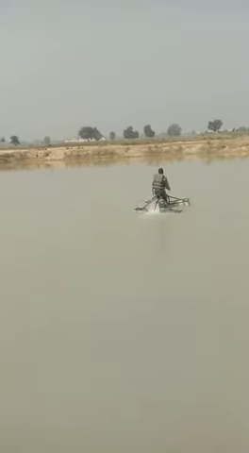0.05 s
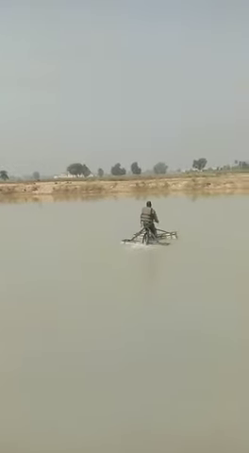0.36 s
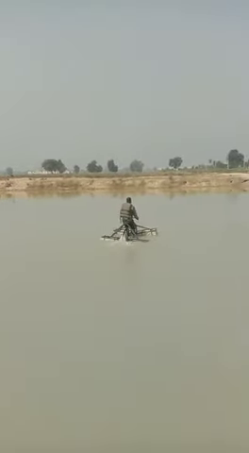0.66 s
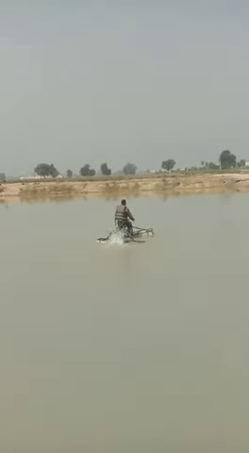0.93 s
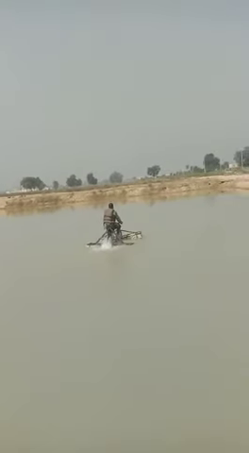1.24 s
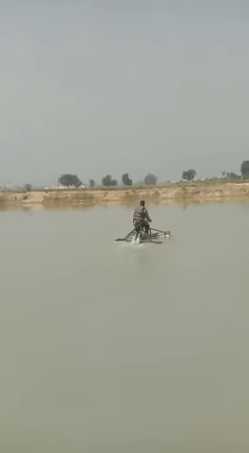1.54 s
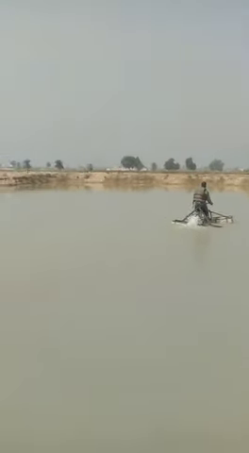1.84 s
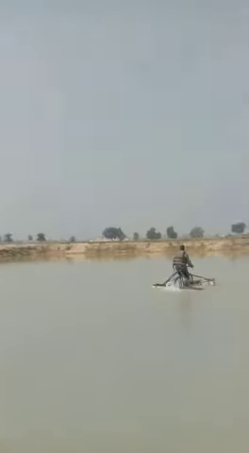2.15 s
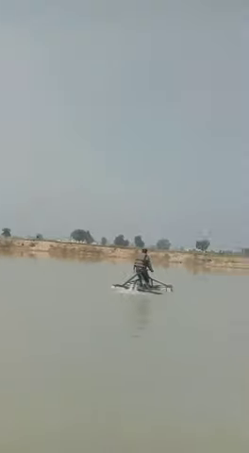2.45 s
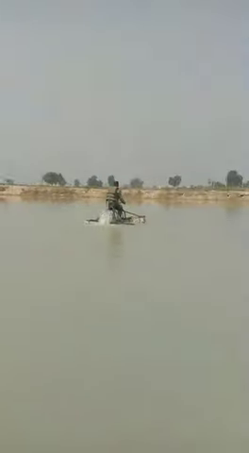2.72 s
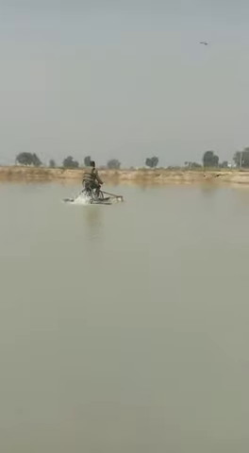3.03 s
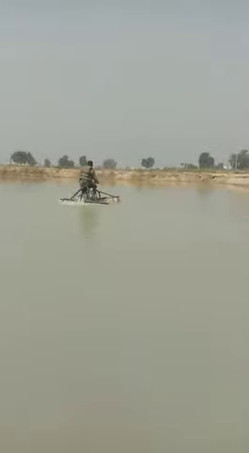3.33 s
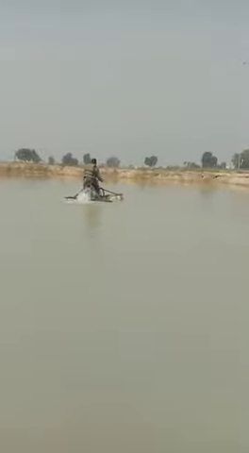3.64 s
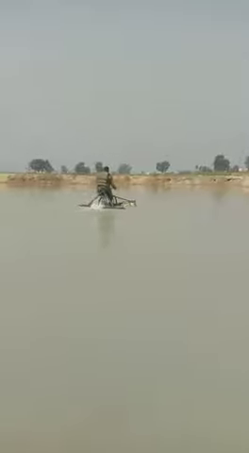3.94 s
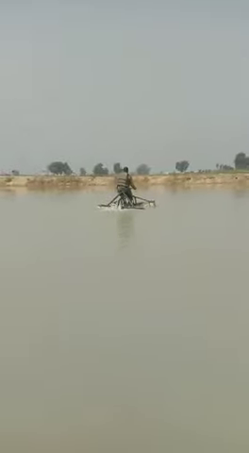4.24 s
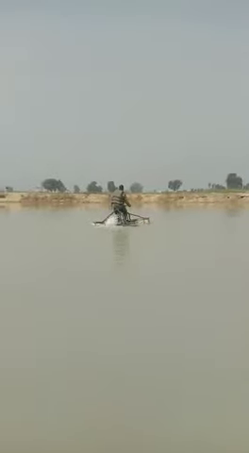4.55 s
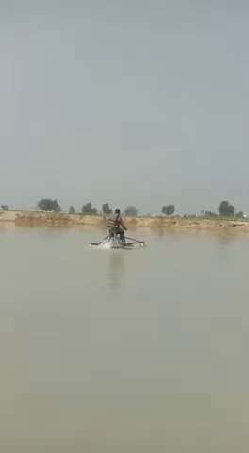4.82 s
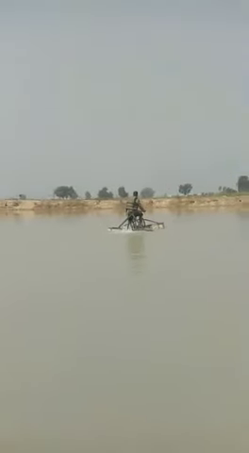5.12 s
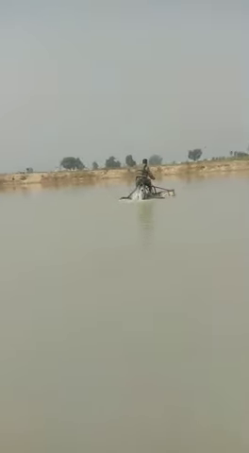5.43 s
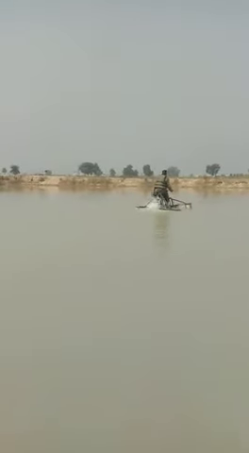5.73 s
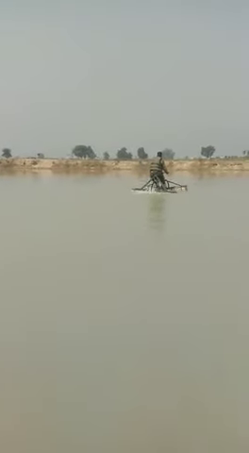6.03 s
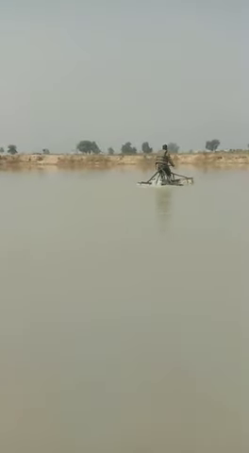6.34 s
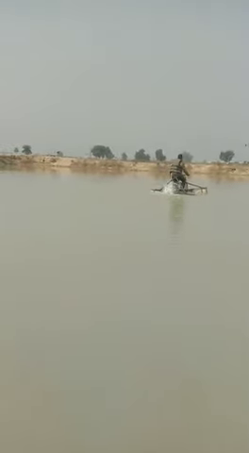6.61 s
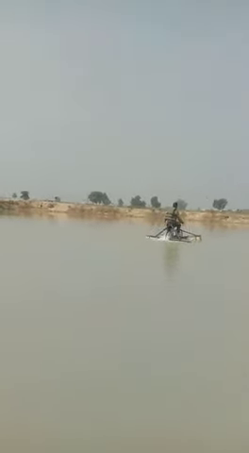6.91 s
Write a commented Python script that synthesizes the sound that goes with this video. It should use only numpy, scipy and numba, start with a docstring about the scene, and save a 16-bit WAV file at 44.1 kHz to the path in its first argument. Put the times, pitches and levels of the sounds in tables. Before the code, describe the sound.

A pedal boat's paddle wheel splashes and churns water some way off, with bubbling gurgles and a low wind rumble on the microphone.

```python
"""From the start a pedal boat crosses a wide pond some way off: its blades slap the water, churn
bubbles under and throw up spray that patters back. At 0.36 s a gust buffets the phone's single
microphone, whose port colours everything; lighter wind goes on. The wash sags as the pedals pass
dead points. At 4.9 s a drop snaps close by. At 7.03 s, the very end, a bird gives one falling call."""
import sys
import numpy as np
from scipy import signal
from scipy.fft import rfft, irfft, next_fast_len
from scipy.io import wavfile
from scipy.ndimage import uniform_filter1d
from numba import njit

SR = 44100
rng = np.random.default_rng(int(sys.argv[2]) if len(sys.argv) > 2 else 0)


def to_wav(sig):
    """Store sig (one row per channel, or 1-D mono) as 16-bit WAV at the path in sys.argv[1].

    Samples outside -1..1 are clipped; the rate is SR.
    """
    pcm = np.clip(np.atleast_2d(sig), -1, 1) * 32767
    pcm = np.round(pcm).astype(np.int16)
    wavfile.write(sys.argv[1], SR, pcm.T)  # frames by channels


N = 311787
TIME_S = np.arange(N) / SR

# Blade slaps, splashes and soft bubble gurgles.
# Each row: start in seconds, slap, gulp and spray in relative dB, burst in seconds.
SPLASHES = [(0.118, -21.5, -38.5, -42.5, 0.018), (0.639, -30.5, -40, -44.5, 0.072),
            (0.779, -28, -39, -33, 0.01), (0.943, -24, -36.5, -37, 0.0095), (1.087, -30, -41.5, -36, 0.025),
            (1.38, -23.5, -41.5, -38.5, 0.0086), (1.577, -20.5, -34, -37.5, 0.0027),
            (1.765, -16, -35.5, -33, 0.013), (1.903, -27, -36, -41, 0.0078),
            (1.955, -39, -39.5, -51, 0.021), (2.158, -22, -43.5, -53, 0.0057),
            (2.373, -29, -44.5, -41, 0.01), (2.431, -29, -42.5, -61, 0.02),
            (2.597, -14, -36.5, -31.5, 0.003), (2.715, -24, -36.5, -35, 0.016),
            (2.88, -25, -39.5, -41, 0.021), (3.305, -20.5, -40.5, -39.5, 0.018),
            (3.456, -23, -43, -40.5, 0.029), (3.641, -24, -38.5, -39, 0.01),
            (3.779, -28, -38, -38.5, 0.0077), (4.016, -26, -43.5, -51, 0.023),
            (4.039, -18.5, -46, -40.5, 0.0076), (4.229, -25, -40, -44.5, 0.023),
            (4.46, -19, -42.5, -45, 0.03), (4.58, -26, -37.5, -36.5, 0.012),
            (4.758, -20, -37.5, -39, 0.021), (4.937, -22, -46.5, -38.5, 0.045),
            (5.251, -17, -38.5, -39, 0.0038), (5.391, -21, -37, -48, 0.022),
            (5.567, -16.5, -37, -36.5, 0.011), (5.705, -19.5, -38.5, -41, 0.0092),
            (5.999, -25, -58, -49, 0.048), (6.202, -21, -43, -43.5, 0.017), (6.414, -19.5, -54, -45, 0.019),
            (6.429, -19.5, -37, -53, 0.0091), (6.559, -23, -39.5, -40, 0.011),
            (6.765, -23.5, -45, -49, 0.03)]
# Water landing flat. Each row: start in seconds, level in dB, share of fine spray from 0 to 1.
FLAT_HITS = [(0.124, -26, 0), (0.701, -36, 0.4), (0.946, -27, 0.34), (1.16, -34, 0.6), (1.343, -31, 0),
             (1.579, -28.5, 0.73), (1.725, -26.5, 0.3), (1.764, -27.5, 1), (2.25, -33, 0),
             (2.591, -22.5, 0.2), (3.165, -27.5, 0.1), (3.292, -28, 0), (3.308, -25, 0.1),
             (3.775, -31, 0.04), (4.043, -33, 0), (4.15, -34.5, 0.6), (4.459, -33.5, 0.33),
             (5.245, -38, 0.3), (5.475, -29.5, 0.47), (5.568, -30.5, 0), (5.579, -30, 0.05),
             (6.429, -26, 0.07), (6.556, -30.5, 0.17), (6.987, -29.5, 0.12)]
# Trapped air. Each row: start in seconds, centre pitch in Hz, peak of each ring in dB.
AIR_POCKETS = [(0.12, 1030, -24), (0.944, 680, -37), (1.767, 860, -45), (2.16, 1190, -36),
               (2.594, 790, -30.5), (3.308, 990, -29.5), (4.04, 1230, -26.5), (4.461, 900, -43),
               (4.762, 635, -43), (5.568, 1210, -24.5)]
# Drift of the wash. Each row: time in seconds, drops, mist and sizzle in relative dB.
WASH_LEVELS = [(0, -42.5, -47, -64), (0.27, -40, -39.5, -62.5), (0.55, -45.5, -49.5, -62.5),
               (0.8, -43.5, -45, -63), (1.12, -40, -41.5, -61), (1.45, -44, -52, -59),
               (2.2, -40, -51.5, -63), (2.75, -44, -49, -63), (3.08, -37, -45, -56),
               (3.55, -42.5, -45.5, -78), (4.25, -43, -48.5, -69), (4.95, -41, -45, -60),
               (5.35, -43, -49.5, -68.5), (5.8, -40.5, -51, -58), (6.3, -45, -50, -70),
               (6.95, -40, -51.5, -59.5)]
# Pedal dead points. Each row: time in seconds, relative depth of the sag in dB.
DEAD_POINTS = [(0.57, 1), (1.53, 1.5), (2.55, 4.5), (4.41, 2.5), (5.34, 6.5), (6.36, 1.8)]
# Thrown sheets. Each row: peak time in seconds, slosh in dB, fizz in dB, half length in seconds.
SHEETS = [(0.286, -48, -61, 0.097), (1.17, -49, -54.5, 0.28), (1.672, -52, -59, 0.072),
          (1.91, -50.5, -60.5, 0.21), (2.243, -46, -53.5, 0.22), (2.504, -57, -59, 0.086),
          (4.523, -51, -54, 0.026), (5.032, -50.5, -71, 0.23), (6.087, -53.5, -68, 0.055),
          (6.922, -45.5, -68, 0.09)]
# Large bubbles. Each row: start in seconds, pitch in Hz, level in dB.
BIG_BUBBLES = [(1.385, 1180, -36.5), (1.765, 701, -27.5), (1.81, 777, -30), (1.828, 1270, -32.5),
               (1.938, 765, -39), (1.971, 2350, -25.5), (2.008, 1350, -31), (2.029, 603, -34),
               (2.133, 1305, -35), (2.159, 1173, -28.5), (2.434, 553, -44), (2.66, 1680, -28),
               (3.817, 423, -42.5), (4.041, 1280, -29.5), (4.457, 1336, -29.5), (6.562, 710, -34)]
# Echo off a nearby hard surface. Each row: time in seconds, delay in ms, gain in dB.
ECHO_PATH = [(0, 2.45, -22), (0.75, 2.32, -19), (1.7, 2.48, -24), (2.7, 2.36, -15), (3.3, 2.25, -11),
             (4.2, 2.27, -7), (4.8, 2.28, -22), (5.4, 2.3, -17), (6.25, 2.19, -11), (7.0, 2.1, -20)]
# Light wind. Each row: time in seconds, level in dB.
BREEZE_LEVELS = [(0, -46), (0.19, -48.5), (0.3, -36.5), (1.05, -45.5), (1.42, -58), (1.75, -49.5),
                 (2.6, -53), (2.95, -46), (4.1, -48), (5.7, -44.5), (6.3, -44), (6.6, -44), (7.07, -42)]
# Gusts. Each row: peak time in seconds, level in dB, half length in seconds.
GUST_PEAKS = [(0.358, -27, 0.057), (0.547, -45.5, 0.082), (0.79, -48, 0.041), (1.085, -45.5, 0.032),
              (1.943, -44, 0.023), (2.26, -47.5, 0.044), (2.445, -45, 0.014)]
# Single eddies at the port. Each row: peak time in seconds, pitch in Hz, level in dB.
EDDIES = [(0.222, 85, -28), (0.234, 196, -30.5), (0.279, 158, -26), (0.305, 199, -15.5), (0.325, 115, -18),
          (0.333, 179, -28.5), (0.381, 153, -23.5), (0.393, 86.5, -17), (0.428, 129, -19.5),
          (0.476, 104, -24), (0.504, 104, -23.5), (0.563, 125, -26.5), (0.578, 121, -25.5),
          (0.655, 83, -34), (0.683, 108, -30), (0.757, 79.6, -23.5), (0.791, 107, -25.5), (0.821, 93, -25),
          (1.927, 76, -31), (6.16, 100, -31.5), (6.254, 106, -31), (6.385, 105, -29.5)]
# Bird call. Each row: time in seconds, pitch in Hz, level in dB.
BIRD_CALL = [(7.033, 1385, -50), (7.034, 1385, -32), (7.048, 1360, -32), (7.058, 1315, -34),
             (7.07, 1175, -38)]
# Its harmonics. Each row: multiple of the pitch, relative level in dB.
BIRD_HARMONICS = [(1, -24), (2, -2), (3, 0), (4, -11), (6, -30)]
# Close ticks. Each row: peak time in seconds, pitch in Hz, level in dB.
NEAR_TICKS = [(0.4115, 6150, -32), (2.417, 7100, -37)]
# Close rustles. Each row: peak time in seconds, level in dB, half length in seconds.
NEAR_RUSTLES = [(0.355, -52, 0.039), (6.113, -47.5, 0.023)]
# Resonances and notches of port and case. Each row: centre in Hz, width in Hz, gain in dB.
PORT_BANDS = [(409, 32, 8), (1253, 80, 10), (1740, 20, 1.5), (4300, 1700, -1.5), (5530, 800, 9),
              (6537, 806, -25.5), (7380, 1600, 11.5), (13540, 1500, -15), (15000, 510, 8.5)]
# Noise profile of the suppressor. Each row: frequency in Hz, density in dB per Hz.
NOISE_FLOOR = [(200, -105), (600, -86), (1200, -99.5), (2800, -86.5), (4300, -91), (5600, -99),
               (7500, -106.5), (10000, -105), (14000, -116), (15500, -117)]

# Source spectra, slap first. Each row: frequency in Hz, relative level in dB.
SLAP_SPECTRUM = [(200, -17), (600, -6.5), (1000, 3.5), (2600, 7), (4000, -6.5), (7000, -12), (16000, -34)]
GULP_SPECTRUM = [(80, -13), (200, -7), (330, -11), (600, 6), (850, 7), (1200, 9), (2500, -10)]  # air pulled under
SPRAY_SPECTRUM = [(1500, -16), (3000, 3.5), (4000, 4), (5500, -3), (8000, 1.1), (10500, -14.5),
                  (13500, -10), (16000, -17)]  # fine spray
DROP_SPECTRUM = [(250, -17.5), (700, -11), (1100, -5.5), (2000, -0.5), (2700, 1.5), (3400, -4),
                 (4000, -11.5), (5000, -14.5), (12000, -43)]  # falling drops
MIST_SPECTRUM = [(1500, -42), (3100, -2), (4200, -8.5), (5500, -4), (7800, 1.5), (9500, -13.5),
                 (13500, -19), (16000, -27)]  # falling mist
SLOSH_SPECTRUM = [(1200, -28), (2800, 0), (3800, 7.5), (4700, -2), (5600, -4), (7000, -36)]  # a sheet's coarse drops
FIZZ_SPECTRUM = [(5000, -27), (7500, 7), (9000, 5), (10700, -1.5), (11800, -27), (16000, -8)]  # a sheet's finest drops
BREEZE_SPECTRUM = [(15, -57), (35, -33), (60, -14.5), (85, -1), (115, -1), (180, -9.5), (260, -27.5),
                   (600, -74), (2000, -81)]  # light wind
GUST_SPECTRUM = [(15, -56), (35, -22), (70, 7), (130, 6), (260, -2), (370, -18), (600, -23), (2000, -43)]  # strong wind
RUSTLE_SPECTRUM = [(3500, -30), (5000, -8), (5800, -11), (6500, 1), (7300, -19), (9000, -37)]  # close rustle
SNAP_SPECTRUM = [(3000, -15), (6000, -7), (8500, 3), (11000, -25), (15500, 3)]  # close drop


def splashes():
    """Blade slaps, splashes and soft bubble gurgles: mixes of impact, trapped air and fine spray."""
    _, slap_db, gulp_db, spray_db, _ = np.transpose(SPLASHES)
    slap = colour(patter(rate_hz=8000, spread_db=3.2), SLAP_SPECTRUM)
    gulp = colour(bubbles(184, 1263, cycles=14.4, spread_db=-0.5, rise=0.25, count=6000), GULP_SPECTRUM)
    spray = colour(patter(rate_hz=8000, spread_db=1.5), SPRAY_SPECTRUM)
    slap *= splash_envelope(slap_db - 17, attack_s=0.002, stretch=1, tail_db=-7, tail_s=0.034)
    gulp *= splash_envelope(gulp_db - 4.5, attack_s=0.005, stretch=1.07, tail_db=-2.5, tail_s=0.046)
    spray *= splash_envelope(spray_db - 5, attack_s=0.00067, stretch=1, tail_db=-2.5, tail_s=0.017)
    return slap + gulp + spray


def splash_envelope(levels_db, attack_s, stretch, tail_db, tail_s, lead_db=-14, lead_s=0.01):
    """Water heaps up, bursts, then closes in again."""
    out = np.zeros(N)
    for (start_s, *_, burst_s), db in zip(SPLASHES, levels_db):
        start = int(start_s * SR)
        span = slice(max(start - SR // 10, 0), start + SR // 2)
        t = TIME_S[span] - start_s
        age_s = np.maximum(t, 0)
        lead = undb(lead_db) * np.exp(-np.abs(t) / lead_s)
        attack = 1 - np.exp(-age_s / attack_s)
        burst = np.exp(-(age_s / (stretch * burst_s)) ** 2)
        tail = undb(tail_db) * np.exp(-age_s / tail_s)
        out[span] += undb(db) * (lead + attack * (burst + tail))
    return out


def cracks(decay_s=0.0023, tail_db=-11, tail_s=0.013):
    """A blade or sheet of water lands flat, snaps and scatters; thin sheets sound brighter."""
    heavy = colour(rng.standard_normal(N), SLAP_SPECTRUM)
    thin = colour(rng.standard_normal(N), SPRAY_SPECTRUM)
    out = np.zeros(N)
    for start_s, db, fine in FLAT_HITS:
        span = slice(int(start_s * SR), int(start_s * SR) + SR // 10)
        t = TIME_S[span] - start_s
        snap = np.sqrt(1 - fine) * heavy[span] + np.sqrt(fine) * thin[span]
        envelope = np.hypot(np.exp(-t / decay_s), undb(tail_db) * np.exp(-t / tail_s))
        out[span] += undb(db) * snap * envelope
    return out


def pockets(count=4, cycles=11.6, spread_octaves=1, breakup_s=0.009):
    """A flat blade shuts in a pocket of air, which breaks into short, hollow rings."""
    out, t = np.zeros(N), TIME_S[:SR // 20]
    for start_s, centre_hz, db in AIR_POCKETS:
        for k, (late, detune) in enumerate(rng.random((count, 2))):
            hz = centre_hz * 2 ** (spread_octaves * (detune - 0.5))
            start = int((start_s + breakup_s * (k + late) / count) * SR)
            decay = np.exp(-np.log(1000) * t * hz / cycles)
            out[start:start + len(t)] += undb(db) * decay * np.sin(2 * np.pi * hz * t)
    return out


def wash(churn_db=-56):
    """Bubbles churn under the wheel while drops and mist rain back unevenly."""
    _, slap_db, gulp_db, spray_db, _ = np.transpose(SPLASHES)
    drops_db, mist_db, sizzle_db = curves(WASH_LEVELS)
    sag_db, flutter_db = wheel_sag_db(), 0.9 * walk(rate_hz=45)
    churn = colour(bubbles(260, 1300, cycles=24, spread_db=2, rise=0.15, count=2800), GULP_SPECTRUM)
    spatter = undb(-10) * bubbles(1000, 4500, cycles=9, spread_db=2.6, rise=0.1, count=3000)
    drops = colour(patter(rate_hz=9000, spread_db=1.6) + spatter, DROP_SPECTRUM)
    mist = colour(patter(rate_hz=14000, spread_db=6.5), MIST_SPECTRUM)
    sizzle = colour(patter(rate_hz=9000, spread_db=5), SPRAY_SPECTRUM)
    # After a splash, bubbles surface, thrown water falls back and fine spray hangs.
    surfacing = np.hypot(undb(churn_db), aftermath(gulp_db - 10.5, peak_s=0.034))
    falling = np.hypot(undb(drops_db - 1.9), aftermath(slap_db - 28.5, peak_s=0.067))
    hanging = np.hypot(undb(sizzle_db + 10), aftermath(spray_db - 17.5, peak_s=0.034))
    return (churn * surfacing * undb(walk(rate_hz=25) - 2.4 * sag_db)
            + drops * falling * undb(flutter_db - 0.63 * sag_db)
            + mist * undb(mist_db - 8 + flutter_db - sag_db)
            + sizzle * hanging * undb(flutter_db - 0.3 * sag_db))


def aftermath(levels_db, peak_s):
    """A swell follows each slap, splash or gurgle and dies away; overlaps add in power."""
    age = TIME_S[:SR] / peak_s
    shape = (age * np.exp(1 - age)) ** 2
    power = np.zeros(N)
    for (start_s, *_), db in zip(SPLASHES, levels_db):
        start = int(start_s * SR)
        power[start:start + SR] += undb(db) ** 2 * shape[:N - start]
    return np.sqrt(power)


def wheel_sag_db(fall_s=0.14, rise_s=0.077):
    """The wheel slows into a dead point: the wash sinks, then recovers with the next push."""
    return sum(db * swell(at_s, np.where(TIME_S < at_s, fall_s, rise_s)) for at_s, db in DEAD_POINTS)


def showers():
    """A sheet of water thrown off the wheel breaks up: coarse drops slosh, the finest fizz."""
    tinkle = undb(-9) * bubbles(2800, 5200, cycles=20, spread_db=1, rise=0.1, count=4000)
    slosh = colour(patter(rate_hz=6000, spread_db=7) + tinkle, SLOSH_SPECTRUM)
    fizz = colour(patter(rate_hz=9200, spread_db=6), FIZZ_SPECTRUM)
    return sum((undb(slosh_db) * slosh + undb(fizz_db) * fizz) * swell(peak_s, half_s)
               for peak_s, slosh_db, fizz_db, half_s in SHEETS)


def plops(cycles=55, rise=0.065):
    """A large bubble rings on its own, rising a little in pitch."""
    out = np.zeros(N)
    for start_s, hz, db in BIG_BUBBLES:
        ring_s = cycles / hz
        t = TIME_S[:int(ring_s * SR)]
        envelope = (1 - np.exp(-t * hz / 2)) * np.exp(-np.log(1000) * t / ring_s)
        phase = 2 * np.pi * hz * t * (1 + 0.5 * rise * t / ring_s)
        out[int(start_s * SR):][:len(t)] += undb(db) * envelope * np.sin(phase)
    return out


def patter(rate_hz, spread_db):
    """Drops land at random moments, their sizes scattered by spread_db."""
    falls = rng.random(N) < rate_hz / SR
    size = undb(spread_db * np.minimum(rng.exponential(size=N), 4))
    return unit(falls * size * rng.choice([-1, 1], N))


def bubbles(low_hz, high_hz, cycles, spread_db, rise, count):
    """Bubbles ring down by 60 dB and glide up as they near the surface."""
    when, pitch, chance, life = rng.random((count, 4)).T
    hz = low_hz * (high_hz / low_hz) ** pitch
    starts, lengths = (when * N).astype(int), SR * cycles * (0.5 + life) / hz
    turn_rad = 2 * np.pi * hz / SR
    glide_rad, damp = turn_rad * rise / lengths, np.log(1000) / lengths
    size = undb(-spread_db * np.log(np.maximum(chance, np.exp(-4))))
    return unit(rings(starts, lengths.astype(int), turn_rad, glide_rad, damp, size))


@njit
def rings(starts, lengths, turn_rad, glide_rad, damp, size):
    """Sum of damped sines, each turning a little faster every sample."""
    out = np.zeros(N)
    for k in range(len(starts)):
        phasor = size[k] + 0j
        step, faster = np.exp(1j * turn_rad[k] - damp[k]), np.exp(1j * glide_rad[k])
        for i in range(starts[k], min(starts[k] + lengths[k], N)):
            out[i] += phasor.imag
            phasor *= step
            step *= faster
    return out


def reflection(x, top_hz=5000):
    """A duller copy off a hard surface combs the sound; the comb shifts as the phone moves."""
    delay_ms, db = curves(ECHO_PATH)
    late = np.interp(TIME_S - delay_ms / 1000, TIME_S, x, left=0)
    return undb(db) * signal.sosfiltfilt(signal.butter(1, top_hz, fs=SR, output="sos"), late)


def wind(eddy_db=5.2, eddy_rate_hz=22):
    """Eddies rumble at the port; a gust spreads deeper and higher and breaks into thumps."""
    breeze_db, = curves(BREEZE_LEVELS)
    flutter_db = eddy_db * np.minimum(walk(eddy_rate_hz), 1)
    breeze = undb(breeze_db + flutter_db) * colour(rng.standard_normal(N), BREEZE_SPECTRUM)
    gust_gain = sum(undb(db) * swell(peak_s, half_s) for peak_s, db, half_s in GUST_PEAKS)
    return breeze + gust_gain * colour(rng.standard_normal(N), GUST_SPECTRUM) + thumps()


def thumps(half_cycles=0.85):
    """An eddy passing the port pushes and pulls the air for a cycle or two."""
    out = np.zeros(N)
    for (peak_s, hz, db), offset in zip(EDDIES, rng.random(len(EDDIES))):
        span = slice(int(peak_s * SR) - SR // 20, int(peak_s * SR) + SR // 20)
        turns = (TIME_S[span] - peak_s) * hz
        envelope = np.exp(-(turns / half_cycles) ** 2)
        out[span] += undb(db) * envelope * np.sin(2 * np.pi * (turns + offset))
    return out


def bird(waver=0.0073):
    """A thin, nasal call starts abruptly, wavers and slides down."""
    hz, db = curves(BIRD_CALL)
    phase = 2 * np.pi * np.cumsum(hz * (1 + waver * walk(rate_hz=400))) / SR
    voice = sum(undb(partial_db) * np.sin(k * phase) for k, partial_db in BIRD_HARMONICS)
    return unit(voice) * undb(db) * (TIME_S > BIRD_CALL[0][0])


def drop_snap(start_s=4.8605, level_db=-24, decay_s=0.002):
    """One drop snaps close by, thin and very high."""
    envelope = (TIME_S > start_s) * np.exp(-np.abs(TIME_S - start_s) / decay_s)
    return undb(level_db) * envelope * colour(rng.standard_normal(N), SNAP_SPECTRUM)


def ticks(half_s=0.00071):
    """Tiny, high ticks close by."""
    return sum(undb(db) * swell(peak_s, half_s) * np.sin(2 * np.pi * hz * (TIME_S - peak_s))
               for peak_s, hz, db in NEAR_TICKS)


def rustles():
    """Faint, thin rustles close by."""
    grains = colour(patter(rate_hz=3000, spread_db=-1), RUSTLE_SPECTRUM)
    return grains * sum(undb(db) * swell(peak_s, half_s) for peak_s, db, half_s in NEAR_RUSTLES)


def suppressor(x, depth_db=-9, knee=0.95, frame_samples=1024):
    """Bands that sink towards the noise profile are turned down further."""
    bins_hz, _, frames = signal.stft(x, SR, nperseg=frame_samples, scaling="psd")
    power = uniform_filter1d(np.abs(frames) ** 2, size=5, axis=-1)
    power = uniform_filter1d(power, size=5, axis=-2)
    hz, db = np.transpose(NOISE_FLOOR)
    noise_power = undb(np.interp(bins_hz, hz, db))[:, None] ** 2
    cut_db = depth_db / (1 + (np.abs(power) / noise_power) ** knee)
    _, out = signal.istft(frames * undb(cut_db), SR, nperseg=frame_samples, scaling="psd")
    return out[..., :N]


def undb(db):
    """Decibels to gain."""
    return 10 ** (np.asarray(db) / 20)


def unit(x):
    """Scale to rms 1."""
    return x / np.sqrt(np.mean(x ** 2))


def curves(table):
    """Each value column as a line through time."""
    times_s, *columns = np.transpose(table)
    return [np.interp(TIME_S, times_s, column) for column in columns]


def colour(x, spectrum):
    """Filter by a spectrum; rms 1."""
    hz, db = np.transpose(spectrum)
    size = next_fast_len(N)
    bins_hz = np.maximum(np.fft.rfftfreq(size, 1 / SR), 1)
    gain = undb(np.interp(np.log(bins_hz), np.log(hz), db))
    return unit(irfft(rfft(x, size) * gain, size)[:N])


def walk(rate_hz):
    """Random steps, slewed; rms 1."""
    hold = max(int(SR / rate_hz), 1)
    steps = np.repeat(rng.standard_normal(N // hold + 1), hold)
    return unit(uniform_filter1d(steps, hold)[:N])


def swell(peak_s, half_s):
    """Gaussian rise and fall."""
    return np.exp(-((TIME_S - peak_s) / half_s) ** 2)


def scene():
    """Open water: no reverberation, only one short reflection from beside the phone."""
    water = splashes() + cracks() + pockets() + wash() + showers() + plops()
    mono = water + reflection(water) + wind() + rustles() + ticks() + drop_snap() + bird()
    return np.array([mono, mono])


def record(dry, top_hz=15480):
    """The port rings and notches, the suppressor dulls quiet moments, a low-pass cuts the top."""
    for hz, width_hz, db in PORT_BANDS:
        turn_rad, damp, gain = 2 * np.pi * hz / SR, np.tan(np.pi * width_hz / SR), undb(db / 2)
        dry = signal.lfilter([1 + damp * gain, -2 * np.cos(turn_rad), 1 - damp * gain],
                             [1 + damp / gain, -2 * np.cos(turn_rad), 1 - damp / gain], dry)
    lowpass = signal.ellip(10, 0.2, 80, top_hz, fs=SR, output="sos")
    return signal.sosfilt(lowpass, suppressor(dry))


dry = scene()
out = record(dry)
to_wav(out)
```